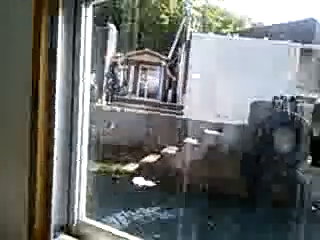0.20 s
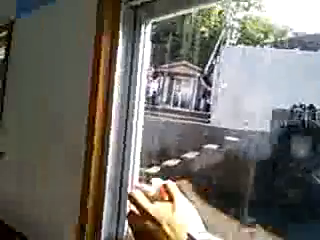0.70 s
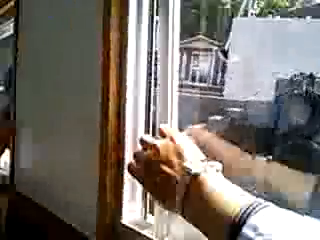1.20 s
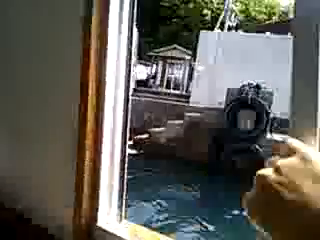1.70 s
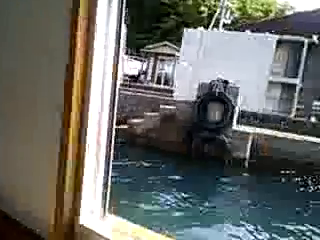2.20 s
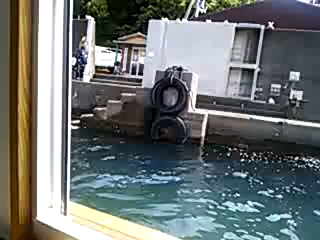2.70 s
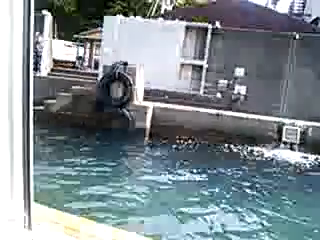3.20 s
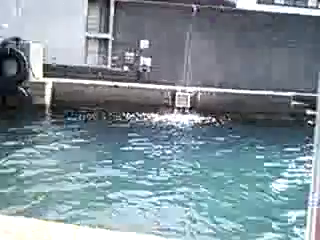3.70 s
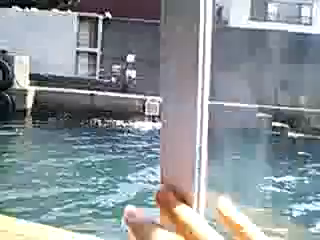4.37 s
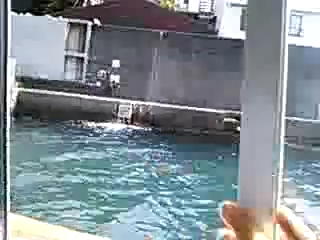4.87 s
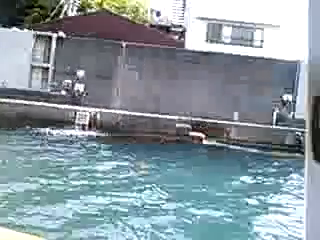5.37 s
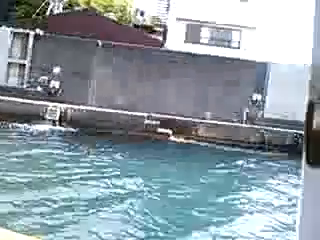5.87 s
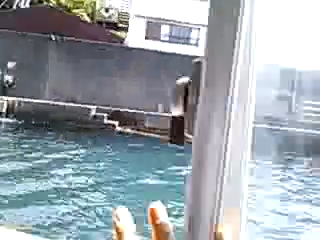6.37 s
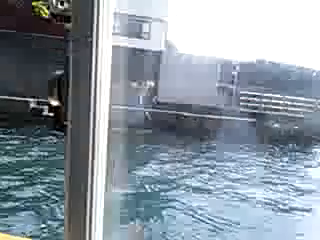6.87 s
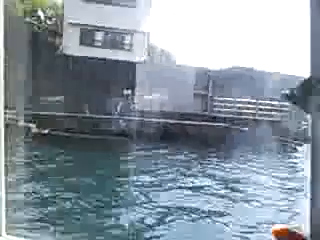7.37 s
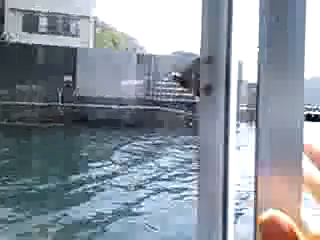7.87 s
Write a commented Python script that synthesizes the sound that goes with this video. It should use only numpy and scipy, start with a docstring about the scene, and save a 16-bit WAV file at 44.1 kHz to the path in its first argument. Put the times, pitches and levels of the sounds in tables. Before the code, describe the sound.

Inside the cabin of a small passenger boat, heard close on one handheld camera with dulled treble, a diesel engine drones throughout at nearly constant speed: a deep throbbing hum around 55 Hz, hull rumble, even midrange clatter and a thin whine. A loose panel buzzes and flutters, swelling and fading, over a soft hiss of water and air. Bumps on the camera come in the first 0.2 seconds, with faint high ticks in the first second and again around 4.4 and 4.8. A sliding window scrapes, squeaks and knocks at 1.5 and 1.8, knocks at 2.6, then thuds with a short squeak at 3.3. A faint knock comes at 4.65. More sliding and small squeaks run from 6.5 to 7.1. From 7.25 to 7.5 a hand rubs and thumps the camera, and at 7.4 the window shuts with a ringing clack. The drone continues, with a light knock at 8.1.

```python
"""Inside the cabin of a small passenger boat running along a quay, on one camera microphone.
Throughout, a six-cylinder diesel drones through the hull as tones locked to its cycle, over cycle-patterned
noise for rumble and clatter, a beating panel and a filtered hiss of water and air. Early come bumps on the
camera body; faint ticks fall now and then; a window slides, squeaks and knocks, as noise, gliding tones and
struck resonances. Near the end a hand rubs and bumps the camera, and the window shuts with a ringing clack."""
import sys
import numpy as np
from scipy import signal
from scipy.fft import rfft, irfft, next_fast_len
from scipy.io import wavfile

SR = 44100
rng = np.random.default_rng(int(sys.argv[2]) if len(sys.argv) > 2 else 0)


def unload_audio(sound):
    """Save the sound as a 16-bit wav file, at the path given as the first command line argument."""
    columns = np.transpose(np.atleast_2d(sound))
    # keep every value between -1 and 1, then stretch to whole-number steps
    steps = np.round(np.clip(columns, -1, 1) * 32767)
    wavfile.write(sys.argv[1], SR, steps.astype(np.int16))


N = 359415
T = np.arange(N) / SR

# All levels stand ahead of the treble limit in record(); an "order" is a multiple of the engine cycle rate.
CYLINDERS = 6
HUM_ORDER = 34  # of the hull hum
TOP_HZ = 7700  # top of the microphone's band
# where in the cycle the panel's orders line up and where it is loosest (cycles); throb (dB), slip (rad)
PANEL_KICK, PANEL_LOOSEST, PANEL_THROB_DB, PANEL_SLIP_RAD = .53, .38, 5.5, .4
# the hand rubbing the camera body: start (s), length (s), level at its height (dB rms)
RUB_AT_S, RUB_S, RUB_DB = 7.25, 0.27, -32.5

# engine speed: time_s, firing_rate_hz
FIRING_RATE = [(0.0, 54.66), (0.7, 54.93), (1.7, 55.33), (3.0, 55.7), (3.7, 55.8), (4.5, 55.65),
               (6.0, 55.6), (7.3, 55.78), (8.15, 55.8)]
# strength of each cylinder's puff, in firing order: strength_db
CYLINDER_STRENGTH = [-2, -3, -5, 3, -7, 3]
# firing tone, swelling as the microphone moves through the cabin's standing waves: time_s, relative_level_db
FIRING_SWELL = [(0, -38.5), (0.3, -40), (0.55, -35), (1.0, -32.5), (2.15, -32), (2.35, -34.5), (2.6, -29.5),
                (3.0, -32), (3.27, -28), (3.5, -31.5), (3.8, -30.5), (5.0, -29), (5.6, -31), (6.0, -30),
                (6.55, -34.5), (6.9, -33), (7.3, -37.5), (7.62, -37), (7.85, -30.5), (8.15, -32)]
# swell of the firing tone's octave: time_s, relative_level_db
OCTAVE_SWELL = [(0, -2), (0.7, -1.5), (1.3, -2.5), (2.25, 2), (2.45, -1.5), (2.8, -0.5), (3.35, -2.5),
                (3.65, -3), (3.95, -2), (4.5, 0.5), (5.1, -7), (6.5, -2), (7.15, -5), (8.15, -1)]
# scatter of the firing overtones by the cabin: time_s, smear (0 crisp to 1 fully smeared)
OVERTONE_SMEAR = [(0, .3), (4.6, .35), (6, 1), (8.15, .9)]
# hull hum, before its flutter: time_s, level_db (rms)
HUM_LEVEL = [(0, -54), (1.3, -45.5), (3, -48), (4.7, -45), (5.4, -47.5), (6.2, -46.5), (7.3, -50),
             (8.15, -44)]
# lesser orders of the hull drone, some of them firing overtones, before they waver: order, level_db (rms)
LESSER_ORDERS = [(2, -47), (3, -47), (4, -51.5), (8, -47.5), (9, -49.5), (16, -46.5), (18, -42.5),
                 (23, -49), (24, -55), (30, -53.5), (36, -50), (38, -61), (48, -56.5), (50, -59.5),
                 (60, -62.5)]
# cabin whine, before its swell: order, level_db (rms)
WHINE_ORDERS = [(74, -51), (137, -63.5)]
# swell of the cabin whine: time_s, relative_level_db
WHINE_SWELL = [(0, -12), (1.4, -6.5), (2.4, -5), (3.3, -6.5), (4.7, -0.5), (6.3, -0.5), (7.25, -8),
               (8.15, -10)]
# buzz of the loose panel, before swell and throb: order, level_db (rms)
PANEL_ORDERS = [(122, -62.5), (123, -55), (126, -58), (129, -64.5)]
# swell of the panel's buzz: time_s, relative_level_db
PANEL_SWELL = [(0, -9), (1.3, 0.5), (2.3, -4), (3.1, 2), (3.9, -4.5), (5.1, 1), (6.4, 3), (7.25, 0.5),
               (8.15, -11)]
# cabin resonances that come and go as the microphone moves:
# pitch_hz, width_hz, level as rows of (time_s, level_db (rms))
CABIN_RESONANCES = [(89, 72, [(0, -51), (0.75, -32), (1.3, -38.5), (2.4, -52), (3, -50), (4.4, -51),
                    (5.5, -67.5), (6.8, -46), (8.15, -65)]), (208, 85, [(0, -34), (0.23, -37), (0.4, -57),
                    (1, -41.5), (1.25, -39), (1.6, -42.5), (2.7, -47.5), (3.8, -56.5), (5, -50), (5.5, -58),
                    (6.4, -62.5), (8.15, -58)]), (603, 260, [(0, -62), (2.2, -62), (2.7, -49), (3.6, -54.5),
                    (4.2, -50), (4.7, -48.5), (5.3, -53), (8.15, -66.5)]), (1083, 240, [(0, -51),
                    (0.5, -47), (1.5, -55), (2.3, -56), (4, -62), (5.2, -48), (7, -51), (8.15, -66)])]
# colour of the hull rumble: frequency_hz, relative_level_db
RUMBLE_COLOUR = [(9, -8), (28, -4.5), (45, 1), (75, 0.5), (130, 0.5), (200, -2), (280, -7), (420, -8),
                 (600, -16.5), (1000, -40)]
# hull rumble, before its sway: time_s, level_db (rms)
RUMBLE_LEVEL = [(0, -32.5), (0.35, -36), (1.9, -36.5), (2.8, -38), (4.3, -34), (5.6, -36.5), (7.1, -34),
                (7.65, -40), (8.15, -34.5)]
# colour of the engine clatter: frequency_hz, relative_level_db
CLATTER_COLOUR = [(200, -15.5), (400, -3), (560, 0), (680, -0.5), (800, -1), (950, 1), (1060, -0.5),
                  (1160, 1), (1280, -0.5), (1450, -3.5), (1700, -8), (2300, -13.5), (2800, -10),
                  (3300, -27)]
# colour of the water and air: frequency_hz, relative_level_db
WASH_COLOUR = [(300, -1.5), (1500, 8), (2800, 1), (3500, 2.5), (4500, 1), (6600, 3), (7100, -5), (8000, -4)]
# bumps on the camera body: start_s, peak_db, push_ms
BUMPS = [(0.027, -27, 2.6), (0.172, -35, 1.8), (0.207, -19.5, 3.7), (7.261, -19, 5.5), (7.268, -17.5, 1.2),
         (7.2753, -17, 1.1), (7.292, -20, 2.8), (7.319, -19, 2.6), (7.3281, -11.5, 5.3), (7.336, -17, 0.69),
         (7.3453, -7.5, 1.22), (7.352, -15, 6.7), (7.381, -15.5, 3.74), (7.418, -23, 7.2),
         (7.435, -19, 2.6), (7.445, -20, 4.8)]
# ringing of the camera body: pitch_hz, relative_level_db, t60_s
BODY_MODES = [(81.4, -6, 0.028), (168, -11, 0.067), (373, 9, 0.013), (527, -3.5, 0.026), (780, -4, 0.021),
              (1050, -11, 0.016)]
# colour of the hand rub: frequency_hz, relative_level_db
RUB_COLOUR = [(30, -1), (110, -6), (250, 2), (450, -19), (800, -21)]
# faint high ticks: start_s, level_db
TICKS = [(0.145, -45), (0.272, -33.5), (0.445, -46), (0.5516, -36), (1.022, -42), (4.383, -42),
         (4.752, -37)]
# sash resonances: pitch_hz, width_hz, relative_level_db
SASH_MODES = [(1380, 330, 8), (1950, 680, 3.5), (2400, 470, -3.5), (3140, 580, 2), (4130, 850, -0.5),
              (4700, 570, -9.5), (5320, 960, 2), (6070, 430, -6.5)]
# sliding strokes: start_s, length_s, low_scrape_db, bright_scrape_db
SLIDES = [(1.48, 0.084, -52, -50), (1.492, 0.012, -48, -44), (1.775, 0.08, -51, -57),
          (3.272, 0.02, -45, -39), (6.52, 0.094, -50, -53), (6.657, 0.96, -49, -51.5),
          (7.09, 0.041, -56, -54), (7.396, 0.05, -41, -39.5)]
# squeaks where the sash sticks: start_s, length_s, pitch_hz, glide_hz_per_s, level_db (rms at its height)
SQUEAKS = [(1.491, 0.017, 1385, 6000, -37.5), (1.776, 0.069, 4750, -400, -51),
           (1.796, 0.05, 2550, -1500, -49), (3.294, 0.0037, 3250, -9000, -31),
           (6.528, 0.0059, 4550, -9000, -45), (6.549, 0.011, 5100, -42000, -44),
           (6.566, 0.007, 3270, -9000, -45), (6.58, 0.01, 4320, -9000, -49),
           (6.969, 0.013, 5900, -12000, -44)]
# the sash knocks in its track: start_s, clack_db, bright_tick_db, frame_thud_db, chatter_db (against the blow)
KNOCKS = [(1.504, -45, -41, -34.5, -20), (1.796, -49, -58, -42, -15), (2.6075, -34, -49, -39.5, -15),
          (2.624, -42, -62, -50, -17), (3.281, -41, -48, -30, -19), (3.2912, -36, -32, -32, -22),
          (3.299, -47, -42, -33, -21), (4.6548, -55, -49, -37, -15), (6.552, -46, -50, -55, -27),
          (6.569, -42, -54, -53, -20), (6.574, -51, -59, -55, -22), (6.593, -47, -55, -53, -17),
          (6.9736, -48, -42.5, -50, -22), (7.1095, -56, -49, -36, -13), (7.408, -45, -52, -30, -20),
          (8.1034, -47, -48, -52, -15)]
# frame resonances: pitch_hz, width_hz, relative_level_db
FRAME_MODES = [(210, 83, 20), (430, 120, 3.5), (650, 60, 4), (1250, 360, -10)]
# the latch strikes and rebounds: start_s, level_db, upper_resonances_db (added above 4 kHz)
LATCH_HITS = [(7.4064, -24.5, 4.5), (7.409, -30.5, -20)]
# latch resonances: pitch_hz, width_hz, relative_level_db
LATCH_MODES = [(480, 250, -12), (1000, 200, -11), (1880, 135, 12), (2220, 160, -5), (3060, 400, -9),
               (4000, 500, -11), (5090, 190, 3), (6230, 500, -7), (7200, 500, -14)]


def undb(db):
    """Decibels to gain."""
    return 10 ** (np.asarray(db) / 20)


def unit(x):
    """Scale to rms 1."""
    return x / np.sqrt(np.mean(x ** 2))


def curve(table):
    """A timed table as one value a sample."""
    return np.interp(T, *np.transpose(table))


def walk(rate):
    """Smooth random drift with a spread near 1, turning about as often as the rate in Hz."""
    knots = rng.standard_normal(400)
    return np.interp(T * rate, np.arange(3200) / 8, signal.resample(knots, 3200))


def colour(x, points):
    """Shape a sound with a smooth (Hz, dB) spectrum that falls away beyond its ends, at rms 1."""
    hz, db = np.transpose(points)
    size = next_fast_len(N)
    f = np.maximum(np.fft.rfftfreq(size, 1 / SR), 1)
    skirt = np.minimum(f / hz[0], 1) ** 2 * np.minimum(hz[-1] / f, 1) ** 3
    gain = skirt * undb(np.interp(np.log(f), np.log(hz), db))
    return unit(irfft(rfft(x, size) * gain, size)[:N])


def ring(force, modes):
    """Pass a force through a set of resonances side by side."""
    out = 0
    for hz, width, db in modes:
        b, a = signal.iirpeak(hz, hz / width, fs=SR)
        out = out + undb(db) * signal.lfilter(b, a, force)
    return out


def stroke(at, length):
    """A movement that swells and fades."""
    return np.sin(np.pi * np.clip((T - at) / length, 0, 1))


def burst(t60):
    """A contact that chatters and dies away."""
    age = T[:SR // 4]
    return rng.standard_normal(len(age)) * undb(-60 * age / t60)


def contact(chatter_db, t60):
    """A sharp blow followed by fine chatter."""
    force = undb(chatter_db) * burst(t60)
    force[0] += 1
    return force


def struck(x):
    """Scale a blow to rms 1 over its first hundredth of a second."""
    return x / np.sqrt(np.mean(x[:SR // 100] ** 2))


def add(out, at, x):
    """Mix a short sound in at a time."""
    i = int(at * SR)
    out[i:i + len(x)] += x[:N - i]


def tone(cycle, order, db):
    """One engine order; firing-rate multiples peak roughly together early, a clear thump, and scatter later."""
    spread = 1 if order % CYLINDERS else curve(OVERTONE_SMEAR)
    offset = (rng.random() - .5) * spread
    return np.sqrt(2) * undb(db) * np.cos(2 * np.pi * (order * cycle + offset))


def flutter():
    """Quick unsteadiness of a cabin tone, in dB."""
    return 2.5 * walk(16)


def drone(cycle, waver_db=1.5, waver_rate=1.27, firing_db=3, octave_db=-32.0):
    """Firing tone, its octave, a hull hum, lesser engine orders (some of them firing overtones) and a whine."""
    out = tone(cycle, CYLINDERS, firing_db + curve(FIRING_SWELL))
    out = out + tone(cycle, 2 * CYLINDERS, octave_db + curve(OCTAVE_SWELL))
    out = out + tone(cycle, HUM_ORDER, curve(HUM_LEVEL) + flutter() / 2)
    whine_swell = curve(WHINE_SWELL) + flutter()
    for orders, swell in ((LESSER_ORDERS, 0), (WHINE_ORDERS, whine_swell)):
        for order, db in orders:
            out = out + tone(cycle, round(order), db + swell + waver_db * walk(waver_rate))
    return out


def panel(cycle, uneven_db=0.1):
    """A loose panel shaken every engine cycle: close orders slip and beat into fluttering beads, then calm."""
    since_kick = cycle - PANEL_KICK
    buzz = np.zeros(N)
    for order, db in PANEL_ORDERS:
        phase = 2 * np.pi * round(order) * since_kick + PANEL_SLIP_RAD * walk(20)
        buzz += undb(db) * np.sqrt(2) * np.sin(phase)
    throb = PANEL_THROB_DB * np.cos(2 * np.pi * (cycle - PANEL_LOOSEST))
    return buzz * undb(curve(PANEL_SWELL) + throb + uneven_db * walk(18))


def machinery(cycle, repeat, depth, fade, drift_rate=0.891):
    """Noise that partly repeats with each engine cycle, one puff a firing, each cylinder at its own strength."""
    size = 4800  # steps in one cycle's pattern
    step = (cycle % 1 * size).astype(int)
    # the repeating pattern changes as the listening place shifts
    weights = np.array([walk(drift_rate) for _ in range(4)])
    patterns = rng.standard_normal((len(weights), size))[:, step]
    pattern = np.sum(weights * patterns, axis=0) / np.linalg.norm(weights, axis=0)
    noise = np.sqrt(repeat) * pattern + np.sqrt(1 - repeat) * rng.standard_normal(N)
    firing = cycle * CYLINDERS
    strength = undb(CYLINDER_STRENGTH)[firing.astype(int) % CYLINDERS]
    puff = np.exp(-(firing % 1) / fade)  # fade in firing periods
    return noise * (1 + depth * strength * puff)


def cabin(cycle):
    """The engine's puffs ring the cabin's resonances, each louder in some places than in others."""
    puffs = machinery(cycle, repeat=.7, depth=.4, fade=.3)
    out = np.zeros(N)
    for hz, width, level in CABIN_RESONANCES:
        mode = [(hz, width, 0)]
        out += undb(curve(level)) * unit(ring(ring(puffs, mode), mode))  # twice, for steeper sides
    return out


def engine(clatter_db=-42, clatter_sway_db=0.5, rumble_sway_db=0.7):
    """The diesel as hull and cabin panels pass it on: a fused rumble below, a crisper, even clatter above."""
    cycle = np.cumsum(curve(FIRING_RATE)) / CYLINDERS / SR  # engine cycles so far
    rumble = colour(machinery(cycle, repeat=.35, depth=.35, fade=.35), RUMBLE_COLOUR)
    rumble = rumble * undb(curve(RUMBLE_LEVEL) + rumble_sway_db * walk(3.55))
    clatter = colour(machinery(cycle, repeat=.6, depth=.3, fade=.3), CLATTER_COLOUR)
    clatter = clatter * undb(clatter_db + clatter_sway_db * walk(3))
    return drone(cycle) + panel(cycle) + cabin(cycle) + rumble + clatter


def wash(level_db=-50, flicker_db=0.6):
    """Even hiss of water and air along the hull."""
    hiss = colour(rng.standard_normal(N), WASH_COLOUR)
    return undb(level_db + flicker_db * walk(8.2)) * hiss


def handling():
    """A hand rubs and bumps the camera body; the longer the push, the duller the bump."""
    rub = colour(rng.standard_normal(N), RUB_COLOUR)
    out = undb(RUB_DB) * stroke(RUB_AT_S, RUB_S) * rub
    age = T[:SR // 4]
    body = sum(undb(db - 60 * age / t60) * np.cos(2 * np.pi * hz * age) for hz, db, t60 in BODY_MODES)
    for at, peak_db, push_ms in BUMPS:
        push = stroke(0, push_ms / 1000)[:len(age)]
        bump = signal.fftconvolve(body, push)
        add(out, at, undb(peak_db) * bump / np.abs(bump).max())
    return out


def ticks(t60=0.11):
    """Faint, thin ticks at the top of the treble, each a dying burst through one narrow resonance."""
    out = np.zeros(N)
    for at, db in TICKS:
        add(out, at, undb(db) * struck(ring(burst(t60), [(8050, 140, 0)])))
    return out


def split(x, split_hz=3700):
    """The low and the bright part of a sound of the sash."""
    low = signal.butter(5, split_hz, "low", fs=SR, output="sos")
    bright = signal.butter(5, split_hz, "high", fs=SR, output="sos")
    return signal.sosfilt(low, x), signal.sosfilt(bright, x)


def sliding(grit_db=2, squeak_waver_hz=130):
    """Uneven friction excites the sash; where it sticks, it squeaks on a wavering, gliding pitch."""
    out = np.zeros(N)
    friction = rng.standard_normal(N) * undb(grit_db * walk(45))
    low, bright = map(unit, split(ring(friction, SASH_MODES)))
    for at, length, low_db, bright_db in SLIDES:
        out += (undb(low_db) * low + undb(bright_db) * bright) * stroke(at, length)
    age = T[:SR // 4]
    for at, length, hz, glide, db in SQUEAKS:
        pitch = hz + glide * age + squeak_waver_hz * walk(600)[:len(age)]
        squeak = np.sqrt(2) * np.sin(2 * np.pi * np.cumsum(pitch) / SR)
        add(out, at, undb(db) * squeak * stroke(0, length)[:len(age)])
    return out


def knocks(chatter_t60=0.065, frame_t60=0.26):
    """The sash rattles in its track and knocks against the frame: blows ring the resonances of both."""
    out = np.zeros(N)
    for at, clack_db, tick_db, thud_db, chatter_db in KNOCKS:
        clack, tick = split(ring(contact(chatter_db, chatter_t60), SASH_MODES))
        thud = ring(burst(frame_t60), FRAME_MODES)
        add(out, at, undb(clack_db) * struck(clack) + undb(tick_db) * struck(tick))
        add(out, at, undb(thud_db) * struck(thud))
    return out


def latch(chatter_db=-22, chatter_t60=0.068):
    """A hard contact rings the latch; the rebound is softer and duller."""
    out = np.zeros(N)
    for at, db, upper_db in LATCH_HITS:
        modes = [(hz, width, gain + upper_db * (hz > 4000)) for hz, width, gain in LATCH_MODES]
        add(out, at, undb(db) * struck(ring(contact(chatter_db, chatter_t60), modes)))
    return out


def window():
    """The sash slides and squeaks, knocks in its track, and latches shut."""
    return sliding() + knocks() + latch()


def scene():
    """Engine, water, hand, ticks and window, at one microphone."""
    return (engine() + wash() + handling() + ticks() + window())[None]


def record(dry):
    """The small camera's narrow band: a steep low-pass takes off the top of the treble."""
    return signal.sosfilt(signal.ellip(10, .2, 80, TOP_HZ, fs=SR, output="sos"), dry)


dry = scene()
out = record(dry)
unload_audio(out)
```